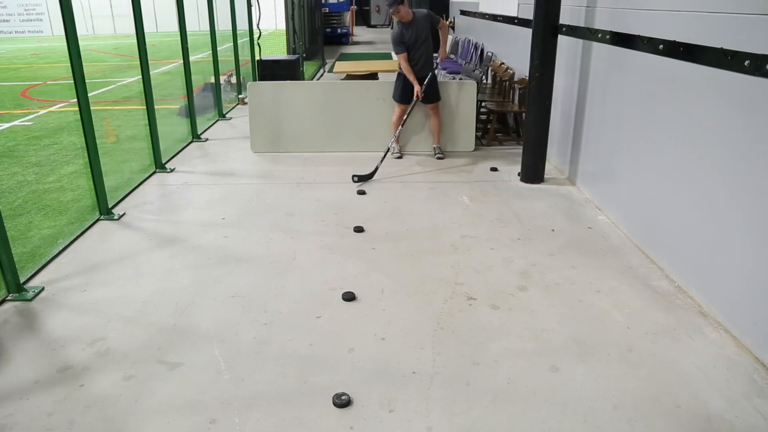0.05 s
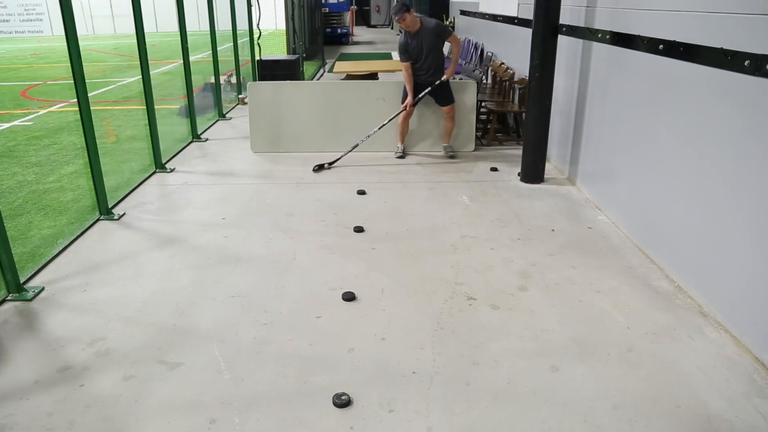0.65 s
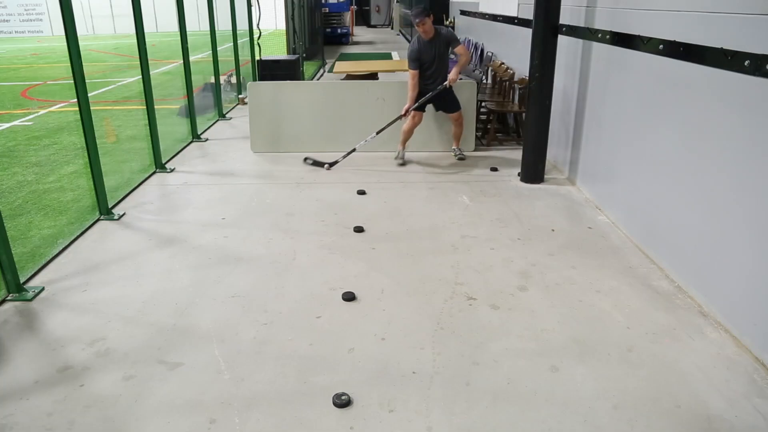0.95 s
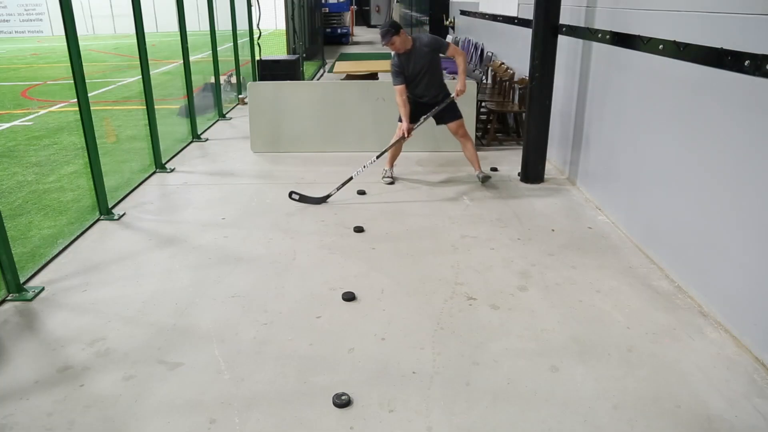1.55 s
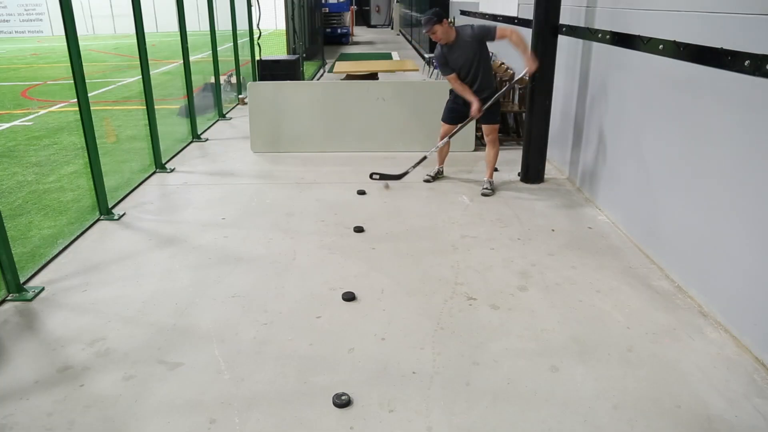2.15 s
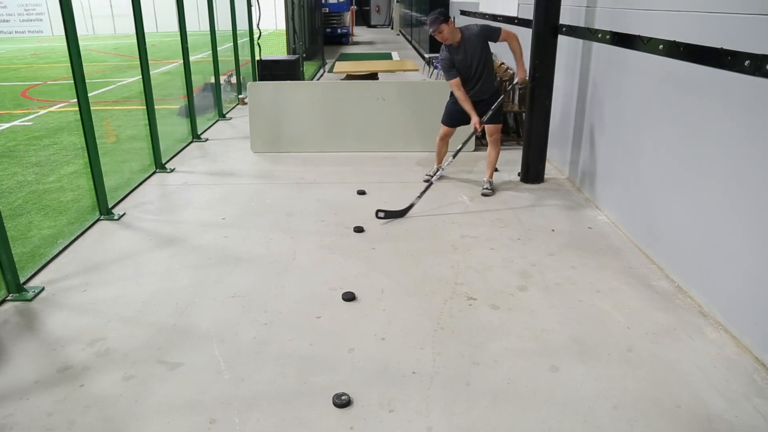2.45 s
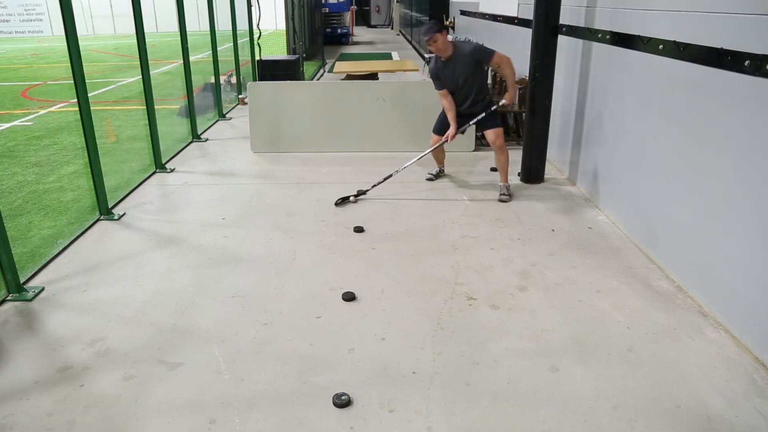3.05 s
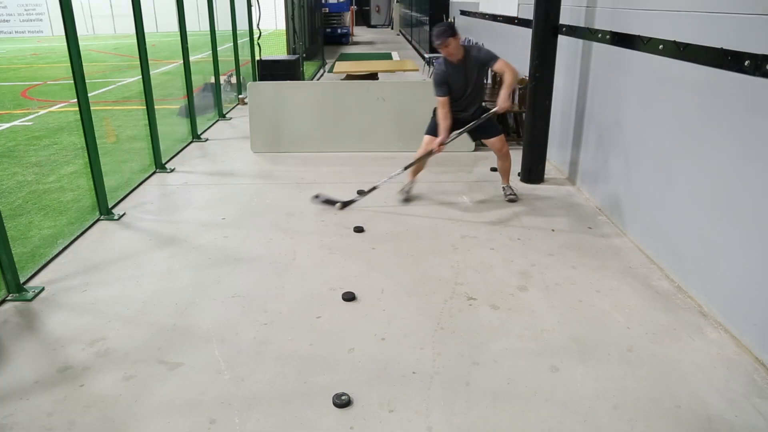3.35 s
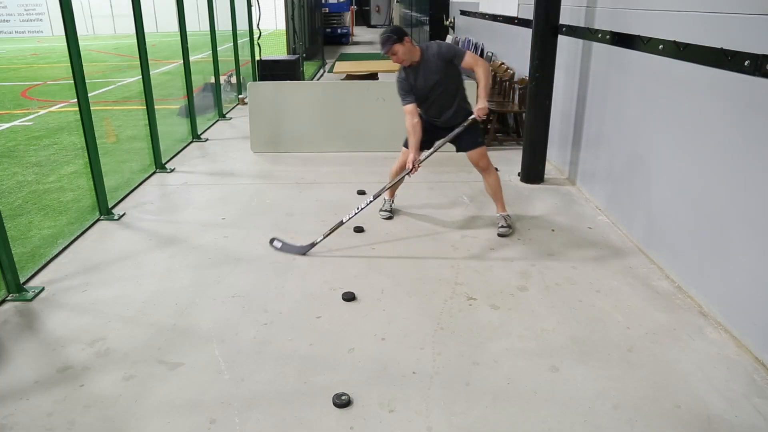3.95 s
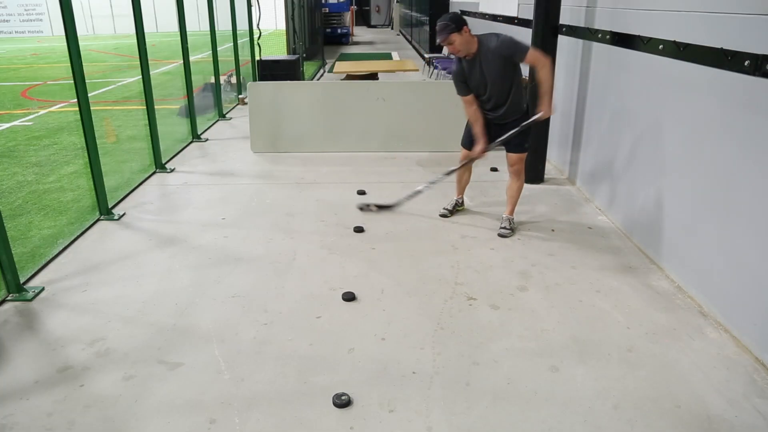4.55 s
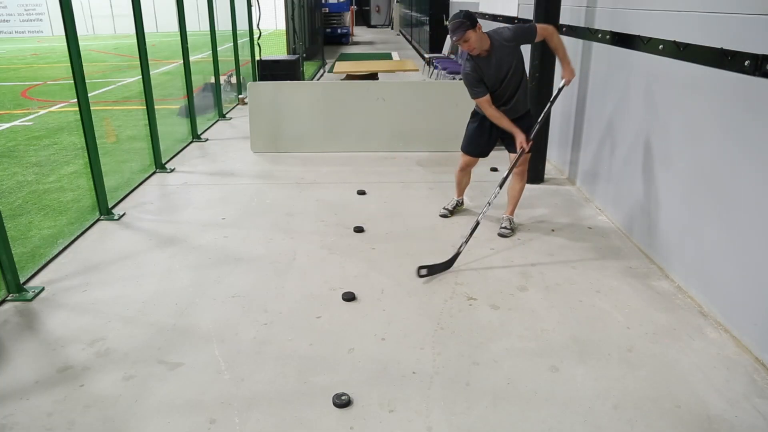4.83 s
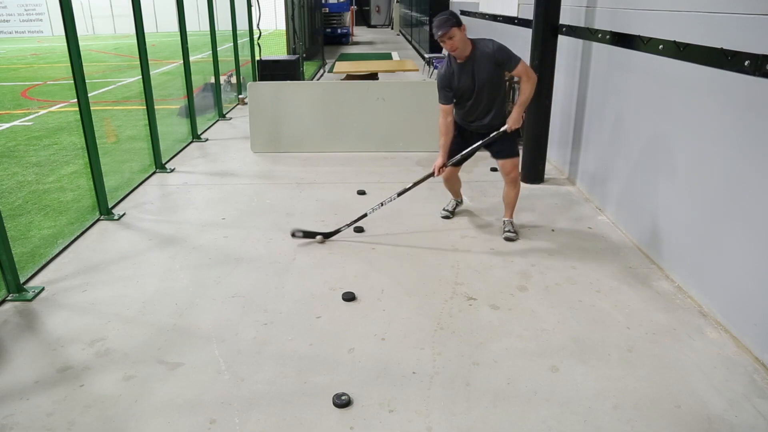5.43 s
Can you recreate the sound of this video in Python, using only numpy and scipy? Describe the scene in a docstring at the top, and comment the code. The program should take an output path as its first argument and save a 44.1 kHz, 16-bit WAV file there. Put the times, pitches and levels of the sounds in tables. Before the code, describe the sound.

In a large, reverberant indoor hall, a hockey stick handles a puck on a concrete floor. Bright, hollow clacks come roughly every half second from start to finish, mixed with flatter thuds on the floor and brief rubbing slides with a little grit. Heard from a short distance, every contact bounces off a side wall and rings on, over a very quiet, steady rush of fans.

```python
"""A hockey stick's hollow blade clacks against a rubber puck on bare concrete in a large hall.
Each contact is a sharp push, a short shell rattle and ringing blade modes. Puck and blade slap
down flat and slide, with a hollow rub and a hiss of grit. A side wall returns sharp echoes,
the hall rings on, and ventilation murmurs underneath."""
import sys
import numpy as np
from scipy import signal
from scipy.fft import rfft, irfft, next_fast_len
from scipy.io import wavfile
from scipy.ndimage import map_coordinates

SR = 44100
rng = np.random.default_rng(int(sys.argv[2]) if len(sys.argv) > 2 else 0)


def int16_out(signal):
    """Quantize to a 16-bit WAV file."""
    q = np.round(np.clip(np.atleast_2d(signal).T, -1, 1) * 32767)
    wavfile.write(sys.argv[1], SR, q.astype(np.int16))


N = 246519


# Blade on puck: t/s, level/dB, thud/dB, bright/dB, sizzle/dB, resonance f/Hz, boost/dB, rebound gap/ms
PUCK_STRIKES = [ (.495, -41.5, 1.5, 5, 5, 3350, 7.5, 0.88), (1.4233, -39.5, 0, 2, -7.5, 3500, 6, 0.6),
                (1.558, -47, -7, 1, -4, 2180, 6, 0.59), (1.9957, -41, -1, 3.5, .5, 1840, 8, 0.82),
                (2.38, -56.5, -2, 2, -9, 1140, 1, .76), (2.7719, -41, -1, 3.5, 3, 3500, 4.5, 0.85),
                (3.3703, -46.5, 4.5, 3.5, 1, 3400, 3, 0.89), (3.7763, -42, 2, 2, -8.5, 3520, 3, 1),
                (4.2922, -40, 0.5, 5.5, -1, 1810, 4.5, .8), (4.832, -45.5, 1, 6.5, -7.5, 1740, 5.5, .55),
                (5.275, -39, 1, 6, 8.5, 2560, 6.5, 0.71), (5.334, -52.5, -1, 2, 1.5, 2500, 6, 0.87), ]

def strikes():
    """Blade hits puck with a bright clack; harder contacts rebound more."""
    track = np.zeros(N)
    for onset_s, db, thud_db, bright_db, sizzle_db, pitch_hz, boost_db, gap_ms in PUCK_STRIKES:
        contact = resonant(blade(ring_db=-1.5), pitch_hz, boost_db)
        contact = chatter(contact, gap_ms, rebound=np.clip(0.28 + 0.06 * sizzle_db, 0, 1))
        add(track, onset_s, knock(contact, db, thud_db, bright_db, sizzle_db, wall_db=-1.5))
    return track


# Puck or blade on floor: t/s, level/dB, thud/dB, ring/dB, sizzle/dB, resonance f/Hz, boost/dB
FLOOR_SLAPS = [ (0.1097, -51.5, 5.5, -1, -.5, 1320, 1.5), (0.5928, -50, 1.5, -4, -2, 1710, 1),
               (1.0575, -48, 3, 1.5, 2, 1570, 8.5), (1.763, -51.5, 6, 8.5, -4, 1500, 1.5),
               (2.074, -43.5, 2.5, -4, -.5, 976, 6), (2.421, -45, 4, -2, 2.5, 1340, 6.5),
               (2.8615, -49, 2.5, -6, -4.5, 1100, -1), (3.844, -48.7, 5, -6.5, -1.5, 990, -4),
               (4.398, -52, 6, 10.5, -13, 2170, 7), (4.901, -43, 5, -1.5, .5, 1350, 9),
               (5.3985, -49.5, 5, -11, -7, 1540, 2.5), ]

def slaps():
    """Flat landings on concrete: more thud, less treble, hardly any rebound."""
    track = np.zeros(N)
    for onset_s, db, thud_db, ring_db, sizzle_db, pitch_hz, boost_db in FLOOR_SLAPS:
        contact = resonant(blade(ring_db), pitch_hz, boost_db)
        contact = chatter(contact, gap_ms=1, rebound=0.054)
        slap = knock(contact, db, thud_db, bright_db=-3.5, sizzle_db=sizzle_db, wall_db=-2.5)
        add(track, onset_s, slap)
    return track


# Hollow blade modes: f/Hz, level/dB, t60/s
BLADE_MODES = [(256, -17.5, .06), (520, -4.5, 0.086), (888, -8.5, 0.17), (1140, -8.5, 0.065),
               (1340, -3, 0.028), (1607, -5.5, 0.051), (2080, 2.5, 0.046), (2340, -1, 0.039),
               (2567, 2, 0.024), (3450, -20, .03), (3516, -2.5, 0.046), (4240, 2.5, 0.024),
               (4855, -13, .03), (5570, -13, .025), (7200, -13, .025), (7640, -1, 0.015)]

def blade(ring_db, rattle_t60_s=0.016, modes_db=-14):
    """One contact: sharp push, brief shell rattle, modes struck at random strengths."""
    t = np.arange(SR // 8) / SR
    ring = amp(ring_db)
    rattle = rng.standard_normal(len(t)) * 1000 ** (-t / rattle_t60_s)
    push = ring * rattle / np.linalg.norm(rattle)
    push[0] += 1
    flat_spectrum = np.exp(1j * np.angle(rfft(push)))  # rattle only spreads the push in time
    push = irfft(flat_spectrum, len(t)) * (t < 0.06)
    hz, db, t60_s = np.transpose(BLADE_MODES)[:, :, None]
    strength = amp(db + rng.standard_normal(hz.shape))
    hz = hz * (1 + 0.008 * rng.standard_normal(hz.shape))  # floor pressure retunes the blade
    phase = rng.uniform(0, 2 * np.pi, hz.shape)
    modes = np.sum(strength * np.sin(2 * np.pi * hz * t + phase) * 1000 ** (-t / t60_s), axis=0)
    ring_share = ring / np.hypot(1, ring)
    return push + ring_share * amp(modes_db) * modes / np.linalg.norm(modes)


def resonant(x, pitch_hz, boost_db, q=9):
    """Boost or cut one blade resonance."""
    b, a = signal.iirpeak(pitch_hz, q, fs=SR)
    return x + (amp(boost_db) - 1) * signal.lfilter(b, a, x)


def chatter(contact, gap_ms, rebound):
    """Two thinner rebounds right after the first touch turn the clack hollow."""
    touches = contact.copy()
    thin = coloured(contact, [(1100, -5.5), (2400, 0.5), (3300, -4)])
    for k in (1, 2):
        add(touches, k * gap_ms / 1000, rebound ** k * thin)
    return touches


# Knock spectrum: f/Hz, level/dB
KNOCK_SPECTRUM = [(40, -39), (110, -34), (180, -18.5), (260, -12.5), (380, -10), (520, -5.5), (750, -1.5),
                  (1100, 2.5), (1700, 3.5), (2500, 1), (4000, -4.5), (6000, -7), (8000, -12.5),
                  (11000, -20), (15500, -31.5)]

def knock(contact, db, thud_db, bright_db, sizzle_db, wall_db):
    """A contact coloured by its hardness; echo delays vary as the puck moves about."""
    near_ms, wall_ms = np.array([4, 13.3]) * (1 + 0.14 * rng.uniform(-1, 1, 2))
    hardness = [(400, thud_db), (1000, 0), (2000, 0.015), (4200, bright_db), (9500, sizzle_db)]
    clack = coloured(coloured(contact, KNOCK_SPECTRUM), hardness)
    sound = signal.fftconvolve(clack, room(near_ms, wall_ms, wall_db))
    return amp(db) * sound / rms(sound[:SR // 20])  # level over the first 50 ms


# Blade rub spectrum: f/Hz, level/dB
RUB_SPECTRUM = [(120, -77.5), (200, -64), (248, -24), (494, -15.5), (748, -14.5), (1040, -4.5),
                (1130, -3.5), (1290, -4), (1810, -4.5), (2420, -6.5), (5070, -18.5), (7020, -24.5),
                (15000, -39.5)]
# Grit hiss spectrum: f/Hz, level/dB
GRIT_SPECTRUM = [(2500, -32), (5000, 13.5), (8000, 5), (12000, -6.5), (15500, -10)]
# Slides on concrete: peak t/s, rub level/dB, grit re rub/dB, rise/s, fall/s, resonance f/Hz, boost/dB
FLOOR_SLIDES = [ (0.084, -68, -32, 0.049, 0.06, 1310, 9), (.29, -69.5, -22, 0.17, 0.044, 1150, 7),
                (.372, -68.5, -31, .03, 0.037, 1340, 5), (1.03, -70.5, -24, 0.1, .1, 1600, 5),
                (1.245, -52, -18, 0.12, 0.04, 1750, 5), (1.77, -55, -16, 0.046, 0.23, 1250, 0),
                (1.825, -53, -6, 0.053, 0.035, 1250, -2), (2.163, -43.5, -26, 0.058, 0.023, 1520, 12),
                (2.187, -54.5, -2.5, .1, 0.023, 1444, 0), (3.135, -69.5, -20, 0.036, 0.11, 1480, -5),
                (3.2, -69, -28, 0.087, 0.037, 1480, 2), (3.35, -69, -12, 0.12, 0.058, 1156, 7),
                (3.515, -63.5, -12, .04, .07, 1156, 6), (3.59, -51.5, -22, 0.13, 0.034, 1140, 7),
                (4.115, -49.5, -12, 0.14, 0.039, 1190, 4), (4.27, -73, -8, 0.14, 0.035, 1190, 0),
                (4.646, -42, -10, 0.11, 0.039, 1340, 7.5), (5.09, -56.5, -21, 0.069, 0.033, 1400, 9), ]

def slides(swell_db=23, grit_exponent=1.3):
    """Each slide gathers speed and stops: hollow blade rub, plus grit hiss that swells more steeply."""
    track, t = np.zeros(N), np.arange(N) / SR
    rub = friction(RUB_SPECTRUM, bumps_db=3, grain_db=18)
    grit = friction(GRIT_SPECTRUM, bumps_db=13, grain_db=22)
    for peak_s, db, grit_db, rise_s, fall_s, pitch_hz, boost_db in FLOOR_SLIDES:
        span = np.flatnonzero((t > peak_s - 2 * rise_s) & (t < peak_s + 2 * fall_s))
        from_peak_s = t[span] - peak_s
        speed_db = -swell_db * np.maximum(-from_peak_s / rise_s, from_peak_s / fall_s)
        hollow = sagging_resonance(rub[span], from_peak_s, pitch_hz, boost_db)
        hollow = amp(db + speed_db) * hollow / rms(hollow)
        hiss = amp(db + grit_db + grit_exponent * speed_db) * grit[span]
        response = room(near_ms=4.5, wall_ms=14, wall_db=-26.5, near_db=-8, corner_db=-7.5, hall_db=-9)
        add(track, t[span[0]], signal.fftconvolve(hollow + hiss, response / np.linalg.norm(response)))
    return track


def friction(spectrum, bumps_db, grain_db, bump_samples=150):
    """Countless tiny catches on concrete, in uneven bunches; rms 1."""
    heights = rng.uniform(-1, 1, N // bump_samples + 4)
    bumps = map_coordinates(heights, [np.arange(N) / bump_samples])
    grains = rng.uniform(-1, 1, N)
    catches = rng.standard_normal(N) * amp(bumps_db * bumps + grain_db * grains)
    sound = coloured(catches, spectrum)
    return sound / rms(sound)


def sagging_resonance(rub, from_peak_s, pitch_hz, boost_db, step_ratio=1.2, step_s=0.026):
    """The rub's resonance crossfades down through three pitches as the slide nears its end."""
    step = np.clip(1.5 + from_peak_s / step_s, 0, 2)
    sound = np.zeros(len(rub))
    for k in range(3):
        weight = np.maximum(1 - abs(step - k), 0)
        sound += weight * resonant(rub, pitch_hz * step_ratio ** (1 - k), boost_db, q=15)
    return sound


# Decay between nearby walls: f/Hz, t60/s
CORNER_DECAY = [(150, 0.23), (1000, 0.45), (5000, 0.25), (14000, 0.058)]
# Hall decay: f/Hz, t60/s
HALL_DECAY = [(150, 0.76), (500, 0.94), (1500, 0.95), (3500, 1.11), (7000, 0.77), (10000, 0.56),
              (15000, 0.25)]

def room(near_ms, wall_ms, wall_db, near_db=-2, corner_db=2, hall_db=-3.5):
    """Impulse response: direct path, near echo, side wall and its repeats, corner and hall tails."""
    echoes = np.zeros(SR)
    for ms, db in [(near_ms, near_db), (wall_ms, wall_db), (wall_ms + 8, -10), (wall_ms + 21, -10)]:
        echoes[round(ms * SR / 1000)] += amp(db)
    early = coloured(echoes, [(200, -11), (2000, 2.5), (7000, 0.5), (15000, -5)])
    early[0] += 1
    corner = amp(corner_db) * tail(CORNER_DECAY, rise_s=0.00091, sparse_db=6.1)
    hall = amp(hall_db) * tail(HALL_DECAY, rise_s=0.012, sparse_db=1.3)
    long_path_loss = [(200, -0.5), (3000, 0), (8000, -1.5), (15000, -6)]
    return early + coloured(corner + hall, long_path_loss)


def tail(decay, rise_s, sparse_db):
    """Diffuse echoes, the first still standing apart; energy 1."""
    hz, frame_s, noise = signal.stft(rng.standard_normal(SR), SR, nperseg=256)
    t60_s = along(decay, hz)[:, None]
    wash = signal.istft(noise * 1000 ** (-frame_s / t60_s), SR, nperseg=256)[1][:SR]
    t = np.arange(SR) / SR
    scatter_db = sparse_db * np.exp(-t / 0.064) * np.clip(rng.standard_normal(SR), -2, 2)
    wash *= amp(scatter_db) * (1 - np.exp(-t / rise_s))
    return wash / np.linalg.norm(wash)


# Fan noise spectrum: f/Hz, level/dB
FAN_SPECTRUM = [(20, -10), (50, 0.5), (130, 7), (300, 1.5), (600, 7), (1300, 7.5), (3000, -9.5),
                (6000, -30), (10000, -25), (15500, -29)]

def ventilation(level_db=-77):
    """Steady rush of the hall's distant fans."""
    air = coloured(rng.standard_normal(N), FAN_SPECTRUM)
    return amp(level_db) * air / rms(air)


def amp(db):
    """Decibels to gain."""
    return 10 ** (np.asarray(db) / 20)


def rms(x):
    """Root mean square."""
    return np.sqrt(np.mean(x ** 2) + 1e-20)


def along(points, hz):
    """Interpolate (f/Hz, value) points over log frequency."""
    point_hz, values = np.transpose(points)
    return np.interp(np.log(hz + 1), np.log(point_hz + 1), values)


def coloured(x, spectrum):
    """Minimum-phase filter shaped by (f/Hz, level/dB) points."""
    size = 2 * next_fast_len(len(x) // 2 + 4096)
    gain = amp(along(spectrum, np.fft.rfftfreq(size, 1 / SR)))
    cepstrum = irfft(np.log(gain))
    cepstrum[1:size // 2] *= 2
    cepstrum[size // 2 + 1:] = 0
    return irfft(rfft(x, size) * np.exp(rfft(cepstrum)), size)[:len(x)]


def add(track, onset_s, sound):
    """Mix sound into track from onset_s on."""
    start = max(round(onset_s * SR), 0)
    part = sound[:max(len(track) - start, 0)]
    track[start:start + len(part)] += part


def scene():
    """Stickhandling over fan noise, mono."""
    return (strikes() + slaps() + slides() + ventilation())[None]


def record(dry):
    """Brief opening silence, then a steep low-pass."""
    start_s, cutoff_hz = 0.078, 16000
    gate = np.arange(N) / SR >= start_s
    lowpass = signal.ellip(10, 0.1, 80, cutoff_hz, fs=SR, output="sos")
    return signal.sosfilt(lowpass, dry * gate)


dry = scene()
out = record(dry)
int16_out(out)
```